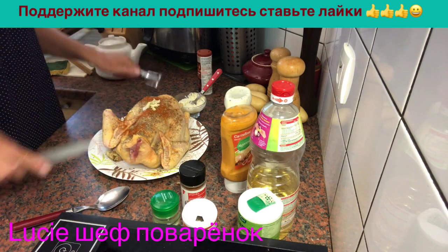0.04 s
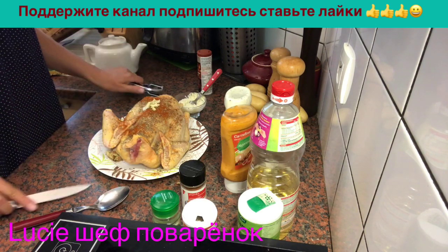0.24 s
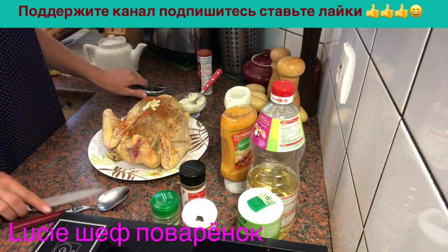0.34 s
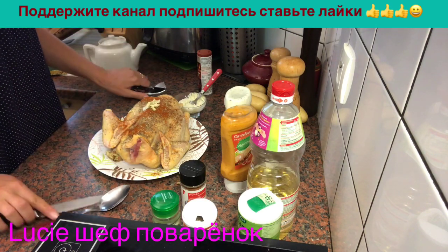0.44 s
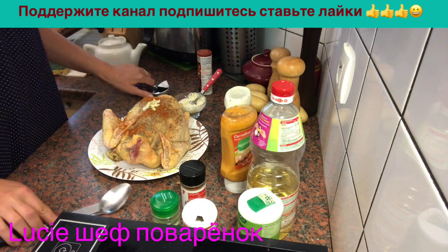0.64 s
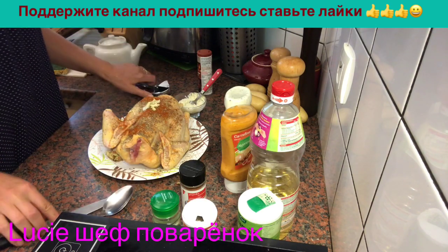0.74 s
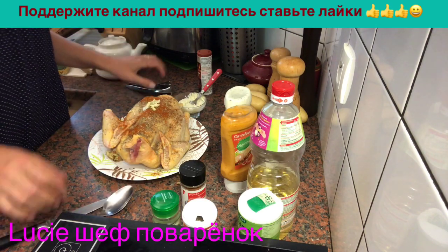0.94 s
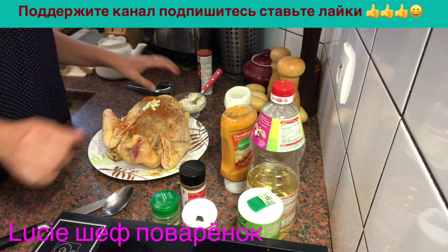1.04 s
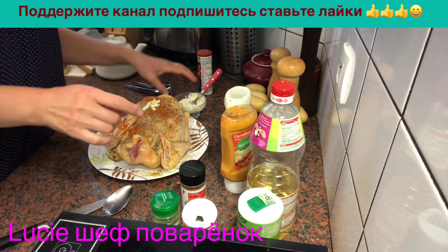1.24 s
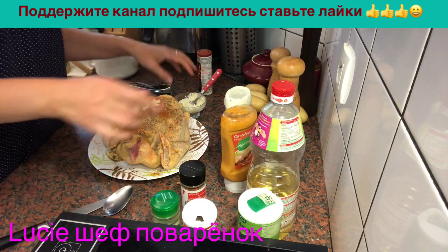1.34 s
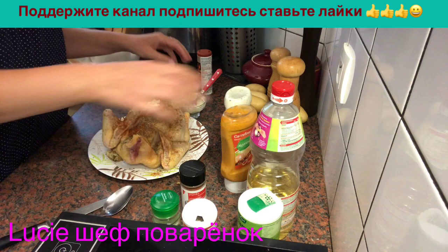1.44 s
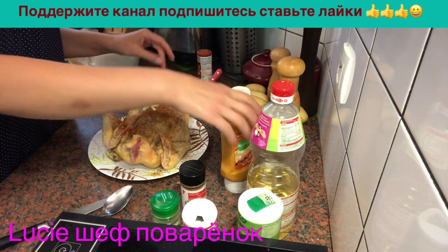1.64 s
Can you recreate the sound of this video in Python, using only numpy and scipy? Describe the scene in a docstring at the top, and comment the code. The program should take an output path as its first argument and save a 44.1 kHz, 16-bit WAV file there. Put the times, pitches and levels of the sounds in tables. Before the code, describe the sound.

Metal kitchen tools clatter on a stone counter: a firm double knock, a short rasping knife scrape, a bright ringing clink, then quick handle taps, fading to faint sleeve rustle in a small tiled kitchen, close microphone.

```python
"""In a small tiled kitchen a metal garlic press is set down on a stone counter as a knife is drawn scraping along.
Knocks and clinks are shaped noise bursts; the counter, knife handle and press ring as banks of modes.
The scrape is a dense train of stick-slip clicks that rasps, rings the blade and shakes the worktop.
Fingers and a sleeve brush softly as the arm reaches forward, over low rumble and room air, all filtered noise.
The tiles answer the tools with dense reflections that die away band by band."""
import sys
import numpy as np
from scipy import signal
from scipy.fft import rfft, irfft
from scipy.io import wavfile
from scipy.ndimage import map_coordinates

SR = 44100
rng = np.random.default_rng(int(sys.argv[2]) if len(sys.argv) > 2 else 0)


def generate_wav(signal):
    """Clip the signal to [-1, 1] and save it as 16-bit WAV at the path in sys.argv[1]."""
    frames = np.transpose(np.atleast_2d(signal))
    scaled = np.clip(frames, -1, 1) * 32767
    pcm = np.round(scaled).astype(np.int16)
    wavfile.write(sys.argv[1], SR, pcm)


N = 74970
TIME = np.arange(N) / SR  # seconds

# Colour tables give relative spectrum only: colour() keeps the power of white noise.
# Tools knock on the counter: start_s, thud_db, clack_db, crack_db, contact_t60_s
KNOCK_HITS = [(.2015, -20.5, -16.5, -33.5, 0.021), (0.2048, -24.5, -25, -34, 0.022),
              (0.2464, -29.5, -25.5, -59, .04), (.343, -32.5, -30.5, -37, 0.039),
              (.3465, -39.5, -29, -44, .04), (.633, -35, -28, -43.5, 0.034),
              (0.7442, -45, -37.5, -62, 0.11), (.855, -32, -34.5, -39.5, 0.064),
              (0.8632, -30.5, -25, -31, 0.07), (0.8857, -43, -26.5, -37.5, .09),
              (.8945, -41.5, -27, -28, 0.098), (.929, -38, -38.5, -47, 0.083),
              (.963, -43, -38.5, -47, 0.075), (1.008, -49.5, -60, -49, .08)]
# Colour of the worktop's thud: pitch_hz, level_db
THUD_COLOUR = [(30, -36), (60, -27.5), (90, -19.5), (120, -2.5), (190, -5.5), (270, -13.5), (345, 1.5),
               (480, -4), (700, -11), (1500, -47)]
# Colour of the tool's clack: pitch_hz, level_db
CLACK_COLOUR = [(250, -38.5), (550, -2), (780, 1), (1150, 3.5), (1450, 0), (1750, -13), (2200, -12.5),
                (2800, -38.5), (6000, -45.5)]
# Colour of the hard contact's crack: pitch_hz, level_db
CRACK_COLOUR = [(800, -43), (1900, 10.5), (3000, 3.5), (4500, -4), (6500, -10), (8500, -15.5), (12000, -26),
                (16000, -34.5)]
# Modes of the stone worktop: pitch_hz, level_db, t60_s
COUNTER_MODES = [(122.1, -16, 0.47), (140, -22.5, 0.46), (340.8, -9.5, 0.29), (382.5, -12.5, 0.42),
                 (497.7, -15.5, 0.25), (568, -20, 0.34), (700, -16, 0.33), (778, -17.5, 0.11),
                 (850, -21.5, .24), (928, -11.5, 0.23), (1047, -13.5, 0.31), (1178, -13.5, .3),
                 (1437, -14.5, .22)]
# The knife handle rocks to rest: start_s, level_db
HANDLE_ROCKS = [(.8637, -29), (.877, -30), (.8865, -28.5), (.8945, -23), (.9005, -32), (.938, -46)]
# Modes of the knife handle: pitch_hz, level_db, t60_s
HANDLE_MODES = [(948, -11, 0.095), (1399, -7, 0.086), (1431, 0, 0.097), (1630, -4.5, 0.061),
                (1926, -5, 0.077), (2603, -6, 0.034), (3286, -12.5, 0.041), (4040, -15, .03)]
# Metal strikes the press: start_s, level_db
CLINK_HITS = [(0.6772, -28.5), (0.6811, -26), (0.7433, -40.5)]
# Modes of the press ringing freely, before the hand damps it: pitch_hz, level_db, t60_s
PRESS_MODES = [(943, -19, 0.16), (1025.5, -7, 0.65), (1100, -12, 0.88), (1538, -15.5, 0.55),
               (2052, -10, 0.17), (2260, -15, 0.15), (3075, -18, 0.16), (3914, -19.5, 0.44),
               (5300, -5, .35), (5990, -11, .22), (5970, -14, 0.18), (6155, -18, .34), (6846, -14, 0.14),
               (7526, -23, 0.4), (8580, -5, 0.072), (9990, -13, 0.27), (10340, -25, .28),
               (11394, -6, 0.073), (12800, -12, 0.19), (13313, -13, .2), (13900, -9, 0.22),
               (14630, -15, 0.2), (15650, -3, .16)]
# Colour of the clink's burst and shimmer: pitch_hz, level_db
CLINK_COLOUR = [(400, -48), (850, -4), (1020, 6), (1300, 0.5), (2150, 3.5), (2650, -2.5), (3000, 1),
                (3500, -8), (3900, 0), (4400, -10), (5300, -2.5), (5650, -10.5), (6200, 5.5), (6900, -2),
                (7900, -9), (8600, -0.5), (9300, -10.5), (10100, -7), (10800, -13), (11450, 6),
                (12100, -10), (12700, 1.5), (14000, -4), (14700, -5), (15200, -16), (15700, -7.5)]
# The blade slides: time_s, rasp_db, hiss_db
SLIDE_LEVELS = [(.345, -65, -75), (.365, -52, -56.5), (.41, -56, -51.5), (.44, -52.5, -58),
                (.495, -47.5, -57.5), (.508, -43.5, -70), (.528, -39.5, -73), (.555, -66, -66),
                (.59, -42.5, -56), (.603, -55, -64), (.615, -41, -54), (.66, -67, -66), (.69, -70, -74)]
# Colour of the rasp on stone: pitch_hz, level_db
RASP_COLOUR = [(500, -19.5), (1000, 7), (1330, -4), (1460, 16), (1600, 3), (1900, 2.5), (2300, 1),
               (2600, 1), (2950, -0.5), (3500, -3.5), (4650, -6.5), (5200, -10.5), (6500, -20), (8000, -24),
               (16000, -29)]
# Modes of the blade: pitch_hz, level_db, t60_s
BLADE_MODES = [(4740, -3, 0.031), (5730, 2, 0.038), (6200, 1, 0.052), (6960, -5, 0.029), (8100, -4, 0.03),
               (8700, -25, 0.064), (9530, 0.5, 0.022), (10900, -15, 0.051), (11370, 0.5, 0.057),
               (12700, -4, 0.022), (13200, -1, .04), (13900, -33, 0.016), (14600, -11, .03),
               (15400, -9, .02)]
# The edge catches: start_s, zing_db, sizzle_db, t60_s
EDGE_CATCHES = [(0.434, -47.5, -72, .09), (0.5638, -45.5, -48, 0.096), (0.5749, -47, -47, 0.054),
                (0.6142, -54, -48, 0.07), (0.619, -64, -44, 0.068)]
# Colour of the lower zing: pitch_hz, level_db
ZING_COLOUR = [(1500, -18), (4000, -10), (6300, 3), (7300, -1), (8500, -2), (10500, -23), (16000, -46)]
# Colour of the highest sizzle: pitch_hz, level_db
SIZZLE_COLOUR = [(4000, -30), (8500, -6), (10500, -2), (14000, 5), (16000, -0.5)]
# The drag shakes the worktop: time_s, level_db
DRAG_LEVEL = [(.35, -63), (.39, -45), (.43, -51.5), (.475, -41), (.52, -49), (.6, -49.5), (.7, -52),
              (.76, -48.5), (.81, -60), (.85, -52)]
# Colour of the shaken worktop: pitch_hz, level_db
WORKTOP_COLOUR = [(60, -24), (130, -2.5), (270, -5.5), (335, 1.5), (390, 7), (460, 1.5), (600, -15),
                  (850, -1.5), (1150, -5), (1600, -3.5), (3000, -41)]
# Fingers brush past in bell-shaped swells: middle_s, half_length_s, level_db
FINGER_STROKES = [(1.042, 0.019, -66.5), (1.196, 0.02, -57.5), (1.297, 0.027, -66.5)]
# Colour of the finger brushes: pitch_hz, level_db
FINGER_COLOUR = [(1500, -12), (3000, -14), (6000, -6), (9000, -6.5), (12000, -0.5), (14500, -2), (16000, 1)]
# The sleeve rustles: time_s, level_db
SLEEVE_LEVELS = [(1.05, -62), (1.21, -64), (1.24, -66.5), (1.29, -62), (1.35, -65.5), (1.45, -57),
                 (1.52, -59.5), (1.7, -60)]
# Colour of the sleeve: pitch_hz, level_db
SLEEVE_COLOUR = [(200, 0.5), (700, -6), (1600, -1), (3000, -1.5), (5000, -14.5), (6500, -16), (9000, -27.5),
                 (16000, -29)]
# Low rumble of someone moving about: time_s, level_db
RUMBLE_LEVELS = [(0, -60), (.025, -77), (.04, -54.5), (.07, -56.5), (.12, -56.5), (.17, -59), (.6, -61.5),
                 (1.1, -65), (1.3, -65.5), (1.52, -61), (1.7, -58.5)]
# Colour of the rumble: pitch_hz, level_db
RUMBLE_COLOUR = [(20, -29), (45, -1.5), (75, -0.5), (150, 0.5), (230, -2), (380, -9.5), (600, -22),
                 (1500, -55.5)]
# Colour of the room air: pitch_hz, level_db
AIR_COLOUR = [(20, -6), (70, 17), (200, -5), (700, -1.5), (2000, -2), (4000, -4), (8000, -12.5),
              (16000, -17.5)]
# Decay of the kitchen's reflections: pitch_hz, t60_s
REFLECTION_T60 = [(100, 0.84), (400, 0.31), (1200, 0.33), (3000, 0.39), (7000, 0.3), (15000, 0.6)]
# Strength of the kitchen's reflections: pitch_hz, level_db
REFLECTION_COLOUR = [(100, -4.5), (400, -6), (1200, 0), (3000, 0.5), (7000, 0.5), (15000, -13)]

BURST_DB, BURST_T60_S = 1.5, 0.08
SHIMMER_DB, SHIMMER_T60_S, CLINK_THUD_DB = -4.5, 0.16, -17
SETTLE_S, SETTLE_DB_PER_S = 0.767, 92  # a hand takes hold of the press and damps its ring
SLIPS_PER_S, SLIP_SPREAD_DB = 2500, 3
BLADE_WANDER, WANDERS_PER_S = 0.0126, 27  # share of the pitch, new random speeds per second
AIR_DB = -69.5
ROOM_BUILD_S = 0.002
KNOCK_WET_DB, METAL_WET_DB, SLIDE_WET_DB, RING_WET_DB = -1.5, -2, -3, -8.5
RINGING_LOW_CUT_HZ = 84  # bass cut on the ringing
MIC_LOW_HZ, CUTOFF_HZ = 30, 15900


def knocks():
    """Each knock is a thud of the worktop, a clack of the tool and a crack of the hard contact."""
    bursts = np.array([contact(row[0], row[-1]) for row in KNOCK_HITS])
    levels = from_db(np.array(KNOCK_HITS)[:, 1:-1])
    colours = (THUD_COLOUR, CLACK_COLOUR, CRACK_COLOUR)
    return sum(colour(level @ bursts, points) for level, points in zip(levels.T, colours))


def contact(s, t60):
    """A dying burst of tiny impacts with an even spectrum and the energy of 5 ms at rms 1."""
    size = 8192
    fade = from_db(-60 * TIME[:size] / t60)
    burst = rng.standard_normal(size) * fade
    # flatten the spectrum and restore the decay by turns
    for _ in range(4):
        spectrum = rfft(burst)
        flat = irfft(spectrum / (np.abs(spectrum) + 1e-12))
        burst = flat * np.sqrt(fade)
    burst *= np.sqrt(.005 * SR) / np.linalg.norm(burst)
    return delayed(np.pad(burst, (0, N)), s)


def clink():
    """Metal on metal: a bright burst that shimmers on, and a light thud of the worktop."""
    burst = sum(from_db(db) * contact(s, BURST_T60_S) for s, db in CLINK_HITS)
    cloud = shimmer(count=400)
    glitter = sum(from_db(db) * delayed(cloud, s) for s, db in CLINK_HITS)
    metal = colour(from_db(BURST_DB) * burst + from_db(SHIMMER_DB) * glitter, CLINK_COLOUR)
    return metal + from_db(CLINK_THUD_DB) * colour(burst, THUD_COLOUR)


def shimmer(count):
    """A cloud of weak, close modes dying after one blow, with the energy of 5 ms at rms 1."""
    size = 16384
    place, turn = rng.random((count, 2)).T
    lines = np.zeros(size // 2 + 1, complex)
    lines[(place * (size // 2)).astype(int)] = np.exp(2j * np.pi * turn)
    cloud = irfft(lines) * from_db(-60 * TIME[:size] / SHIMMER_T60_S)
    return np.pad(cloud * np.sqrt(.005 * SR) / np.linalg.norm(cloud), (0, N))


def ringing():
    """The worktop, the knife handle and the press ring on in their modes after their blows."""
    damping = from_db(-SETTLE_DB_PER_S * np.maximum(TIME - SETTLE_S, 0))
    counter = from_db(-0.5) * struck(KNOCK_HITS, COUNTER_MODES, spread_db=0.5)  # driven by thud_db
    handle = from_db(-0.6) * struck(HANDLE_ROCKS, HANDLE_MODES, spread_db=0.9)
    press = from_db(-4.5) * struck(CLINK_HITS, PRESS_MODES, spread_db=0.2) * damping
    return highpass(counter + handle + press, RINGING_LOW_CUT_HZ)


def struck(hits, modes, spread_db):
    """Every hit clicks each mode with a random sign and a strength of its own."""
    s, db = np.transpose(hits)[:2]
    chance = rng.standard_normal((len(s), len(modes)))
    out = 0
    for k, mode in enumerate(modes):
        force = np.zeros(N)
        strength = from_db(db + spread_db * chance[:, k])
        force[(s * SR).astype(int)] = strength * rng.choice([-1, 1], len(s))
        out = out + ring(force, [mode])
    return out


def ring(force, modes):
    """Two-pole resonators: a unit click sets every mode ringing at its level, in alternating sign."""
    out = 0
    for k, (hz, db, t60) in enumerate(modes):
        r = from_db(-60 / (t60 * SR))  # decay per sample
        w = 2 * np.pi * hz / SR
        mode = signal.lfilter([0, np.sin(w)], [1, -2 * r * np.cos(w), r * r], force + 1e-18)
        out = out + (-1) ** k * from_db(db) * mode
    return out


def scrape():
    """Slips rasp on the stone, ring the blade and shake the worktop; now and then the edge catches."""
    rasp, hiss = gains(SLIDE_LEVELS)
    drag, = gains(DRAG_LEVEL)
    force = slips()
    catches = 0
    for s, zing_db, sizzle_db, t60 in EDGE_CATCHES:
        burst = contact(s, t60)
        catches = catches + from_db(zing_db) * colour(burst, ZING_COLOUR)
        catches = catches + from_db(sizzle_db) * colour(burst, SIZZLE_COLOUR)
    blade_ring = rms_one(wander(ring(force, BLADE_MODES)))
    blade = rms_one(blade_ring + from_db(-2) * colour(force, SIZZLE_COLOUR))
    stone = rasp * colour(force, RASP_COLOUR)
    worktop = drag * colour(force, WORKTOP_COLOUR)
    return stone + hiss * blade + worktop + catches


def slips():
    """Stick and slip: dense clicks of uneven size and random sign, rms 1."""
    sizes = from_db(SLIP_SPREAD_DB * np.minimum(rng.exponential(1, N), 5)) * rng.choice([-1, 1], N)
    return rms_one(sizes * (rng.random(N) < SLIPS_PER_S / SR))


def wander(x):
    """The blade's pitch shifts as the contact point moves: read the sound at a drifting speed."""
    speed = np.interp(TIME * WANDERS_PER_S, np.arange(N), rng.standard_normal(N))
    return map_coordinates(x, [np.arange(N) + BLADE_WANDER * np.cumsum(speed)], order=3)


def movement():
    """Fingers brush, the sleeve rustles and the body shifts: three noises under their own levels."""
    strokes = sum(from_db(db) * np.exp(-.5 * ((TIME - s) / half) ** 2) for s, half, db in FINGER_STROKES)
    fingers = strokes * noise(FINGER_COLOUR)
    sleeve = gains(SLEEVE_LEVELS)[0] * noise(SLEEVE_COLOUR)
    rumble = gains(RUMBLE_LEVELS)[0] * noise(RUMBLE_COLOUR)
    return fingers + sleeve + rumble


def kitchen(x):
    """Dense reflections off the tiles: noise bands that build up fast and die at their own rates."""
    edges = np.geomspace(60, 18000, 13)
    tail, t = 0, TIME[:SR // 2]
    for low, high in zip(edges, edges[1:]):
        hz = np.sqrt(low * high)
        bandpass = signal.butter(2, [low, high], "band", fs=SR, output="sos")
        band = signal.sosfilt(bandpass, rng.standard_normal(len(t)))
        band = band * from_db(-60 * t / at_hz(REFLECTION_T60, hz)) * (1 - np.exp(-t / ROOM_BUILD_S))
        level = np.sqrt(2 * (high - low) / SR) * from_db(at_hz(REFLECTION_COLOUR, hz))  # share of bandwidth
        tail = tail + band / np.linalg.norm(band) * level
    return signal.fftconvolve(x, tail)[:N]


def air():
    """The quiet room: steady coloured noise."""
    return from_db(AIR_DB) * noise(AIR_COLOUR)


def noise(points):
    """Coloured noise from white noise of rms 1."""
    return colour(rng.standard_normal(N), points)


def colour(x, points):
    """Causal (minimum-phase) filter with the given spectrum; white noise keeps its power."""
    size = 4096
    cepstrum = irfft(np.log(from_db(at_hz(points, np.arange(size // 2 + 1) * SR / size))))
    # fold the cepstrum forward in time
    cepstrum[1:size // 2] *= 2
    cepstrum[size // 2 + 1:] = 0
    response = irfft(np.exp(rfft(cepstrum)))
    return signal.oaconvolve(x, response / np.linalg.norm(response))[:N]


def at_hz(points, hz):
    """Read a table on a log-frequency axis."""
    f, v = np.transpose(points)
    return np.interp(np.log(np.maximum(hz, 1)), np.log(f), v)


def gains(rows):
    """Each dB column as a gain in time, practically silent outside the table."""
    s, *columns = np.transpose(rows)
    return [from_db(np.interp(TIME, s, c, left=-140, right=-140)) for c in columns]


def highpass(x, hz):
    """Second-order bass cut."""
    return signal.sosfilt(signal.butter(2, hz, "high", fs=SR, output="sos"), x)


def delayed(x, s):
    """Start a sound at time s."""
    return np.concatenate([np.zeros(max(int(s * SR), 0)), x])[:N]


def rms_one(x):
    """Scale to rms 1."""
    return x / np.sqrt(np.mean(x ** 2) + 1e-20)


def from_db(db):
    """Decibels to gain."""
    return 10 ** (np.asarray(db) / 20)


def scene():
    """The tools, their reflections, the soft movement and the room air."""
    sources = np.array([knocks(), clink(), scrape(), ringing()])
    wet = from_db([KNOCK_WET_DB, METAL_WET_DB, SLIDE_WET_DB, RING_WET_DB])
    room = kitchen(wet @ sources)
    return (sources.sum(axis=0) + room + movement() + air())[None]


def record(dry):
    """The small microphone loses the deep bass; the top is cut steeply."""
    thin = highpass(dry, MIC_LOW_HZ)
    return signal.sosfilt(signal.ellip(10, .2, 70, CUTOFF_HZ, fs=SR, output="sos"), thin)


dry = scene()
out = record(dry)
generate_wav(out)
```